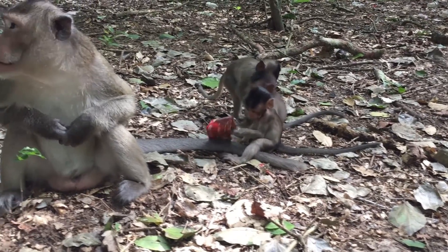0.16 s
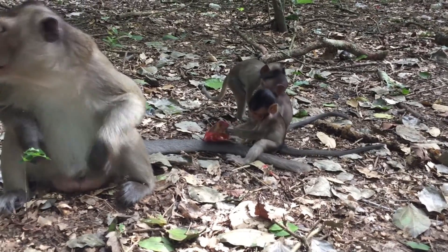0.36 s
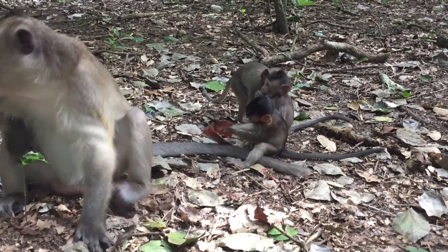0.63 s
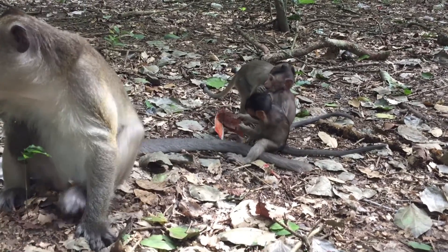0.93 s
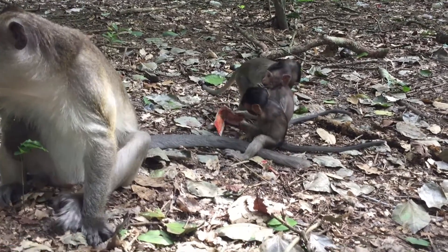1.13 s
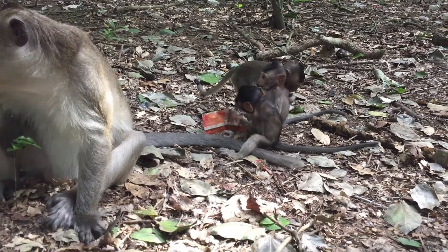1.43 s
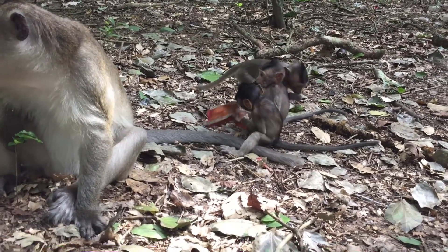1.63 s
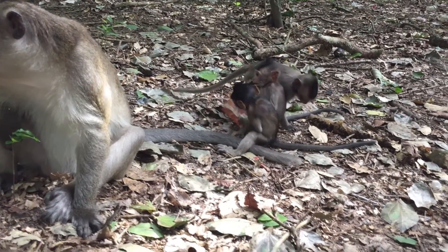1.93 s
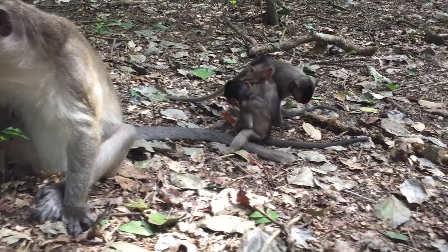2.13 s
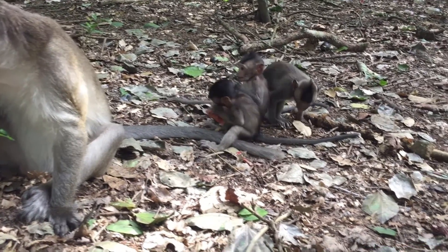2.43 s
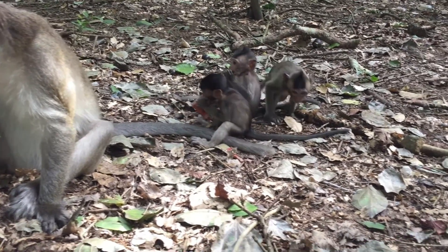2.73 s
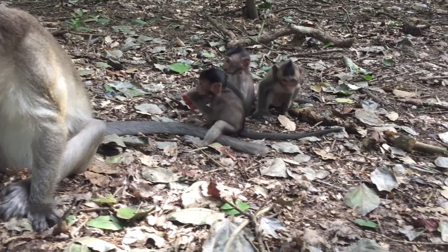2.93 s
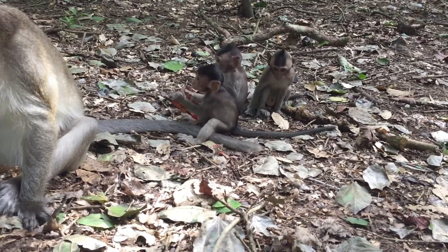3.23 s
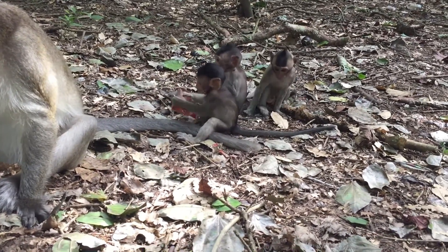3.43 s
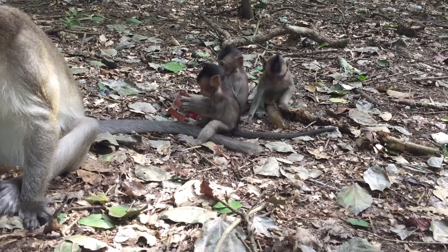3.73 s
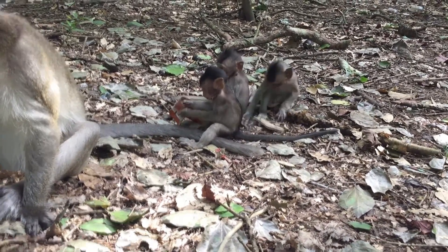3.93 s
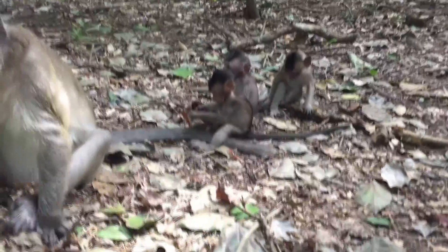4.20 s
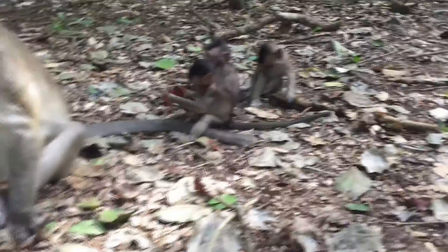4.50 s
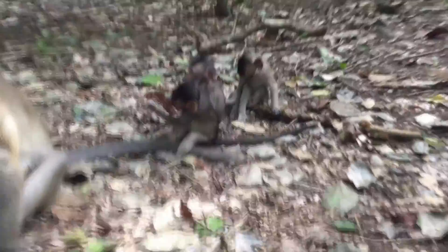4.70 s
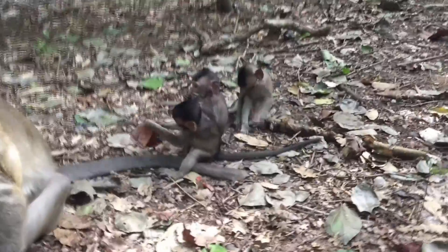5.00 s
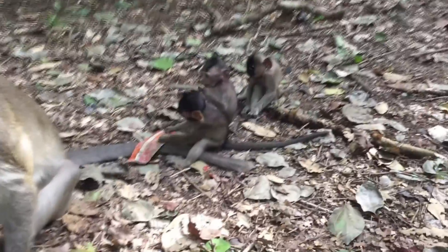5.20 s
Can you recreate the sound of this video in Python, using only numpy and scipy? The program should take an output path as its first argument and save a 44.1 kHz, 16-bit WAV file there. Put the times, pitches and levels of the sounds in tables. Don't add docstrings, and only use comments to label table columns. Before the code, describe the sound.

Hollow carton bangs boom and rattle over crackling dry leaves, followed by one short monkey squeak, with low wind rumble on the microphone.

```python
import sys
import numpy as np
from scipy import signal
from scipy.fft import rfft, irfft
from scipy.io import wavfile
from scipy.ndimage import uniform_filter1d

SR = 44100
rng = np.random.default_rng(int(sys.argv[2]) if len(sys.argv) > 2 else 0)


def store_wav(level_fs):
    pcm = np.round(np.clip(np.atleast_2d(level_fs), -1, 1) * 32767)
    wavfile.write(sys.argv[1], SR, pcm.T.astype(np.int16))


def undo_db(level):
    steps = np.asarray(level, float) / 20
    return 10 ** steps


N = 236133

# frequency in Hz, level in dB per Hz.
HUSH_SPECTRUM = [(150, -35), (250, 2), (505, -10), (693, -3.5), (1400, -8.5), (2210, -9), (9180, -19),
                 (10400, -22), (11500, -20.5), (15300, -24.5), (16700, -42.5)]
HUSH_DB = -67.5
# band centre in Hz, t60 in seconds, level of all the echo in dB.
TREE_ECHO = [(400, .25, -24), (1500, .3, -21), (4000, .25, -21), (10000, .2, -23)]
# start in seconds, end in seconds, pitch in Hz, level in dB.
FAR_BIRD_NOTES = [
    (0, 0.136, 2520, -70.5),
    (0, 0.104, 1428, -72.5),
    (.25, .58, 1510, -75),
    (2.991, 3.07, 1192, -72),
    (4.556, 4.63, 1015, -74),
    (4.9, 5.098, 1017, -76.5),
    (5.247, 5.404, 975, -74),
]
# time in seconds, rumble level in dB.
WIND_GUSTS = [(0, -47), (.12, -46), (.19, -53), (.28, -47.5), (1.41, -49), (1.56, -45.5), (1.62, -55),
              (1.74, -48), (2.22, -48), (2.56, -53), (3.05, -47.5), (3.58, -53), (3.62, -49.5), (4.05, -49),
              (4.26, -55.5), (4.31, -47.5), (5.35, -51.5)]
# frequency in Hz, level in dB per Hz.
WIND_SPECTRUM = [(12, -51), (20, -23), (29, -15), (39, -3.5), (70, 2), (92, 1.5), (118, -6), (155, -10.5),
                 (231, -20), (300, -38.5), (390, -44.5), (660, -120)]
FLUTTER_DB, FLUTTER_FOLLOWS = -74, 0.4

# loudest moment in seconds, time to fade 20 dB in seconds
# (negative swells slowly and stops fast), level in dB, treble relative to it in dB.
LITTER_STIRS = [(0, 0.2, -60, -7), (.33, 0.22, -69, -2.5), (.47, 0.03, -70, -8), (.555, 0.16, -58, -3.5),
                (.61, 0.21, -51.5, -2), (.7, 0.08, -60, 1.5), (.87, -0.24, -70, -1), (.95, 0.26, -63, -3.5),
                (1.5, 1, -65, -14), (2.038, 0.04, -49, -24), (2.13, 0.15, -63.5, -15),
                (2.62, 0.02, -61.5, -12), (3.019, -0.44, -64, -16), (3.19, 0.07, -61, -3.5),
                (3.225, 0.1742, -69.5, -12), (3.328, 0.57, -70.5, -4), (4.17, 0.5958, -69.5, -7.5),
                (4.33, -0.8, -73.5, -12), (4.91, 0.9, -69, -14), (5.02, 0.0316, -63.5, -6.5),
                (5.15, 0.09, -58.5, -7.5)]
STIR_RISE_SHARE = 0.35
STILL_DB, STILL_TREBLE_DB = -79.5, -84
# low edge in Hz, high edge in Hz, treble share from 0 to 1, level in dB.
LEAF_SIZES = [
    (900, 2360, 0.01, -4.5),
    (2300, 4250, 0.11, -2.5),
    (4580, 7290, 0.52, -1.5),
    (7500, 11000, 0.94, -4),
    (11100, 14300, 1, -2.5),
]

# time in seconds, level in dB, ring in Hz, brightness in dB per band.
GROUND_THUDS = [(.301, -58, 392.4, -4), (.372, -46.5, 483.4, 2), (.381, -52.5, 814, 0.5),
                (2.03, -57.5, 426, 3), (4.032, -58, 502, -1.5), (4.052, -53.5, 170, -11.5),
                (4.07, -53, 389.6, -8.5), (4.087, -51, 815, -5), (4.101, -59, 470, -8),
                (4.722, -50, 299.4, -10), (4.729, -41.5, 226, -12), (4.733, -53, 811, 7),
                (4.765, -61.5, 170, -15), (4.815, -59, 424.3, 0), (4.86, -64.5, 557, 0),
                (.96, -63, 397, -3.5), (1.48, -58, 340, -1)]
# low edge in Hz, high edge in Hz.
THUD_RANGES = [(140, 300), (300, 580), (580, 950)]
THUD_LENGTH_S, THUD_MIDDLE_DB = 0.0043, 6.5
# time in seconds, # level in
# dB, ring in Hz, brightness in dB per band.
LEAF_SNAPS = [(.032, -60.5, 1500, 2), (.0654, -49, 7800, 3), (.0728, -51.5, 7660, 3),
              (.1058, -64.5, 2650, -11.5), (.1966, -55.5, 6074, 2), (.3405, -49.5, 4170, -2.5),
              (.383, -57, 8440, 4), (.483, -58.5, 4175, -1), (.5412, -59.5, 11370, 1.5),
              (.5658, -51.5, 6913, -4), (.5925, -42, 7016, 0.5), (.615, -52.5, 11990, -6),
              (.6342, -40.5, 9100, -0.5), (.6866, -52, 11370, -1), (.7986, -52, 7340, 2),
              (.933, -59, 6200, 4), (1.068, -55, 4508, -10), (1.3383, -51.5, 4488, 0),
              (1.475, -52, 4100, -2), (1.5352, -45, 5170, -5), (1.6096, -59, 2338, -8),
              (1.6453, -57.5, 3270, -6.5), (1.6951, -48, 4150, 0.5), (1.711, -52, 6170, 2),
              (1.7675, -64, 11400, 6), (1.8199, -52, 8100, 3.5), (1.8775, -53.5, 4250, 1),
              (2.0343, -54, 3120, -11), (2.0559, -56.5, 4046, -8.5), (2.1278, -63.5, 3600, -11)]
# time in seconds, level in dB, ring in Hz,
# brightness in dB per band.
FOIL_CRUMPLES = [(2.405, -61.5, 6986, 0), (2.4413, -68.5, 3510, -8), (2.5791, -60.5, 4470, -3.5),
                 (2.609, -49, 3314, -6), (2.7509, -64, 11550, 3.5), (2.9507, -58.5, 3150, 0),
                 (2.9804, -66, 2881, -11), (3.0101, -41.5, 3620, -2), (3.0307, -50.5, 3858, -7),
                 (3.1829, -54, 3200, -4.5), (3.2018, -60.5, 3203, -6.5), (3.3088, -46.5, 3910, -8),
                 (3.3158, -47, 8900, -1.5), (3.3326, -52.5, 3693, -0.5), (3.3509, -52, 6580, -5),
                 (3.4988, -62, 8907, 0.5), (3.7455, -56, 7956, -0.5), (3.9194, -66.5, 2740, -5),
                 (4.0952, -61, 8360, 6), (4.1716, -57, 8480, 4.5), (4.3424, -61, 7882, -4.5),
                 (4.8453, -58, 4025, -2.5), (4.9, -59, 3363, -9.5), (4.926, -62, 3639, -9),
                 (5.0074, -58, 4329, 0), (5.1307, -64, 3044, -12), (5.1445, -54.5, 8300, 4.5),
                 (5.1676, -58, 5510, -5), (5.2699, -61.5, 5370, 1), (5.293, -66, 3380, -7.5)]
# low edge in Hz, high edge in Hz.
SNAP_RANGES = [(1900, 4200), (4200, 8000), (8000, 15800)]
SNAP_LENGTH_S, SNAP_MIDDLE_DB = 0.000958, 0.5
# time in seconds, level in dB, ring in Hz, length in seconds.
TWIG_KNOCKS = [
    (0.019, -57, 1800, 0.0014),
    (.073, -51, 1400, 0.0013),
    (1.9, -53, 800, 0.00079),
    (1.4785, -43, 1170, .0018),
]

# time in seconds, pitch in Hz, level in dB.
SQUEAK_ARCH = [
    (3.619, 872, -80),
    (3.626, 878, -54),
    (3.645, 918, -48),
    (3.665, 957, -46),
    (3.69, 995, -48),
    (3.712, 1010, -50),
    (3.745, 962, -55),
    (3.769, 897, -63),
    (3.78, 875, -84),
]
# frequency in Hz, level in dB.
THROAT_SPECTRUM = [(800, 2), (1100, -1.5), (1900, -14.5), (2650, -5.5), (3000, -11.5), (3500, -11.5),
                   (3900, -8), (4500, -8), (5000, -41), (6000, -24), (7000, -36), (8000, -18.5),
                   (11100, -18.5), (11800, -39), (16000, -45)]
MOUTH_START_DB, MOUTH_OPENS_DB_PER_S = -2, 24

# time in seconds, air boom in dB, side panel in dB,
# wall in dB, lid in dB.
CARTON_BLOWS = [
    (1.058, -28.5, -33, -29.5, -42.5),
    (1.178, -23, -25.5, -16.5, -30),
    (1.263, -32.5, -28.5, -41, -48.5),
    (1.2838, -25, -26, -33, -27.5),
    (1.5553, -47.5, -35, -39, -27),
    (1.8913, -46, -33.5, -29.5, -28.5),
    (1.9034, -23, -23.5, -15.5, -19.5),
]
# frequency in Hz, level in dB, t60 in seconds.
CARTON_MODES = [(203, 0, 0.13), (371.5, -3.5, 0.036), (470, -5, 0.017), (712.3, -4, 0.04),
                (950, -35.5, .01), (1380, 4, 0.00887), (1642, 2, 0.012), (2209, 6, 0.0062),
                (2645, -5, 0.024), (3120, -23.5, 0.0034), (3734, -5, 0.015), (4150, -3.5, 0.018),
                (4660, -11.5, 0.016), (5461.6, 3, .011), (6449.3, -8.5, 0.0077), (8160, -11.5, 0.0096),
                (9100, -7.5, 0.012), (10140, -7, 0.0022), (14300, -12, 0.0048)]
# frequency in Hz, level in dB per Hz.
SCATTER_SPECTRUM = [(250, 8.5), (600, 0), (1400, 4.5), (2500, 1.5), (4000, 4), (7000, -3.5), (11000, -8.5),
                    (16000, -16)]
CONTACT_S = 0.0015
FOIL_CRACK_DB = -8


def unit(x):
    return x / np.sqrt(np.mean(x ** 2))


def peak(x):
    return x / np.abs(x).max()


def curves(table):
    s, *columns = np.transpose(table)
    return [np.interp(np.arange(N) / SR, s, column) for column in columns]


def shape(points, hz):
    f, db = np.transpose(points)
    return np.interp(np.log(np.maximum(hz, 1)), np.log(f), db)


def coloured(points):
    hz = np.fft.rfftfreq(N, 1 / SR)
    spectrum = rfft(rng.standard_normal(N)) * undo_db(shape(points, hz))
    return unit(irfft(spectrum, N))


def band(x, lo_hz, hi_hz, order=2):
    edges = [lo_hz, min(hi_hz, 0.45 * SR)]
    return signal.sosfilt(signal.butter(order, edges, "band", fs=SR, output="sos"), x)


def ring(x, hz, t60):
    pole = np.exp(2j * np.pi * hz / SR - np.log(1000) / (max(t60, 0.002) * SR))
    return signal.lfilter([1], [1, -pole], x).imag


def walk(rate):
    k = int(SR / rate)
    steps = np.repeat(rng.standard_normal(N // k + 1), k)
    slewed = uniform_filter1d(uniform_filter1d(steps, k), k)
    return unit(slewed[:N])


def add(out, s, sound):
    i = int(s * SR)
    out[i:i + len(sound)] += sound[:N - i]


def burst(length_s, size, click):
    t = np.arange(size) / SR / max(length_s, 0.0002)
    force = rng.standard_normal(size) * t * np.exp(-1.6 * t)
    force[4] = click
    return force


def by_band(events, middle_db, length_s):
    return [(s, db - bright_db, db + middle_db, db + bright_db, hz, length_s)
            for s, db, hz, bright_db in events]


def contacts(events, bands, cycles, click, lift_db):
    out = np.zeros(N)
    for s, *levels, hz, length_s in events:
        force = burst(length_s, size=2048, click=click)
        for db, (lo, hi) in zip(levels, bands):
            sound = peak(band(force, lo, hi, order=3))
            if lo <= hz < hi:
                singing = peak(ring(band(force, lo, hi), hz, cycles / hz))
                sound = peak(0.8 * sound + singing)
            add(out, s, undo_db(db + lift_db) * sound)
    return out


def hush():
    return undo_db(HUSH_DB - 2.0 + 0.3 * walk(2.5)) * coloured(HUSH_SPECTRUM)


def trees(x):
    t = np.arange(SR // 2) / SR
    echo = np.zeros(len(t))
    for hz, t60, db in TREE_ECHO:
        fade = np.minimum(t / 0.0025, 1) * undo_db(-60 * t / t60)
        scatter = band(rng.standard_normal(len(t)), hz / 2, hz * 2)
        echo += undo_db(db) * fade / np.linalg.norm(fade) * scatter
    return signal.fftconvolve(x, echo)[:N]


def far_bird():
    t = np.arange(N) / SR
    waver = undo_db(4 * walk(25))
    drifting_s = np.cumsum(1 + 0.006 * walk(12)) / SR
    notes = np.zeros(N)
    for start, end, hz, db in FAR_BIRD_NOTES:
        progress = np.clip((t - start) / (end - start), 0, 1)
        swell = np.sqrt(np.clip(np.sin(np.pi * progress), 0, 1))
        notes += undo_db(db) * swell * np.sin(2 * np.pi * hz * drifting_s)
    return waver * notes


def wind():
    gust_db = curves(WIND_GUSTS)[0]
    rumble = undo_db(gust_db) * unit(undo_db(1.15 * walk(9.1)) * coloured(WIND_SPECTRUM))
    flutter_db = FLUTTER_DB + FLUTTER_FOLLOWS * (gust_db + 50) + 2.5 * walk(25)
    flutter = undo_db(flutter_db) * unit(band(rng.standard_normal(N), 150, 420))
    return rumble + flutter


def stirs():
    t = np.arange(N) / SR
    body, treble = undo_db(STILL_DB) ** 2, undo_db(STILL_TREBLE_DB) ** 2
    for s, fade_s, db, treble_db in LITTER_STIRS:
        away = np.maximum((t - s) / fade_s, (s - t) / (STIR_RISE_SHARE * fade_s))
        power = undo_db(db - 20 * away) ** 2
        body = body + power
        treble = treble + power * undo_db(treble_db) ** 2
    return 10 * np.log10(body), 10 * np.log10(treble)


def leaf_grains(per_second):
    return (rng.random(N) < per_second / SR) * undo_db(3.0 * rng.exponential(size=N))


def rustle():
    out = np.zeros(N)
    tail = np.exp(-np.arange(512) / SR / 0.003)
    body_db, treble_db = stirs()
    shared = leaf_grains(60)
    for lo_hz, hi_hz, share, db in LEAF_SIZES:
        rough = 0.9 + signal.lfilter(tail, 1, leaf_grains(250) + shared)
        level_db = body_db + share * (treble_db - body_db) + db + 2.0 * walk(15)
        out += undo_db(level_db) * unit(band(rough * rng.standard_normal(N), lo_hz, hi_hz))
    return out


def thuds():
    bumps = by_band(GROUND_THUDS, THUD_MIDDLE_DB, THUD_LENGTH_S)
    grit = [(s, top_db - 9.5, 0, length_s) for s, _, _, top_db, _, length_s in bumps]
    soft = contacts(bumps, THUD_RANGES, cycles=14.0, click=0, lift_db=0.5)
    return soft + contacts(grit, [(1400, 1940)], cycles=1, click=0, lift_db=2.5)


def snaps():
    twigs = contacts(TWIG_KNOCKS, [(900, 1450)], cycles=9, click=0.5, lift_db=0)
    breaks = by_band(LEAF_SNAPS + FOIL_CRUMPLES, SNAP_MIDDLE_DB, SNAP_LENGTH_S)
    return twigs + contacts(breaks, SNAP_RANGES, cycles=13, click=1.0, lift_db=5)


def squeak():
    hz, db = curves(SQUEAK_ARCH)
    t = np.arange(N) / SR
    start_s, end_s = SQUEAK_ARCH[0][0], SQUEAK_ARCH[-1][0]
    open_db = np.clip(MOUTH_START_DB + MOUTH_OPENS_DB_PER_S * (t - start_s), -2, 1)
    hz = uniform_filter1d(hz, size=700) * (1 + 0.0015 * walk(90))
    phase = 2 * np.pi * np.cumsum(hz) / SR
    tones = np.zeros(N)
    for k in range(1, 17):
        unsteady_db = (1 + 0.35 * k) * walk(45) - 0.35 * k
        tone_db = shape(THROAT_SPECTRUM, k * hz) + open_db * np.log2(k) + unsteady_db
        tones += undo_db(tone_db) * np.sin(k * phase)
    puff = np.exp(-((t - 3.656) / 0.01573) ** 2) + 0.25
    breath = undo_db(-20) * puff * unit(band(rng.standard_normal(N), 6500, 11000))
    voiced = (t > start_s) & (t < end_s)
    return undo_db(4 + db) * (tones + breath) * voiced


def panels(force, grip):
    detune = 1 + 0.012 * rng.standard_normal(len(CARTON_MODES))
    out = np.zeros(len(force))
    for m, (hz, db, t60) in enumerate(CARTON_MODES[1:]):
        mode = peak(ring(force, hz * detune[m], t60))
        out += (-1) ** m * undo_db(db + shape(grip, hz)) * mode
    return out


def carton():
    out, t = np.zeros(N), np.arange(16384) / SR
    bins = np.fft.rfftfreq(len(t), 1 / SR)
    fade = np.minimum(t / 0.0014, 1) * (undo_db(-60 * t / 0.11) + undo_db(-12.5 - 60 * t / 0.53))
    air_hz, _, air_t60 = CARTON_MODES[0]
    push = t * np.exp(-t / 0.00066)
    boom = peak(ring(push, air_hz, air_t60) + undo_db(-7) * ring(push, air_hz * 1.4, 0.045))
    for s, boom_db, side_db, wall_db, lid_db in CARTON_BLOWS:
        contact_s = CONTACT_S * undo_db(0.18 * (wall_db + 11.5))
        force = burst(contact_s, size=4096, click=2.14)
        grip = [(800, side_db), (1300, wall_db), (1900, lid_db), (2700, lid_db), (3500, wall_db + FOIL_CRACK_DB)]
        add(out, s, panels(force, grip))
        add(out, s + 0.0028, undo_db(boom_db) * boom)
        colour = undo_db(shape(SCATTER_SPECTRUM, bins) + uniform_filter1d(shape(grip, bins), size=900))
        scatter = irfft(rfft(rng.standard_normal(len(t))) * colour)
        add(out, s, undo_db(-7.5) * fade * scatter)
    return out


def scene():
    near = snaps() + thuds() + squeak()
    background = hush() + far_bird() + wind()
    return (background + rustle() + near + trees(near) + carton())[None]


def band_limit(x):
    return signal.sosfilt(signal.butter(12, 16840, fs=SR, output="sos"), x)


def record(dry):
    thin = signal.sosfilt(signal.butter(2, 46, "high", fs=SR, output="sos"), dry)
    mix = thin - 0.3 * band(thin, 10360, 10440, order=1)
    return band_limit(mix)


dry = scene()
out = record(dry)
store_wav(out)
```